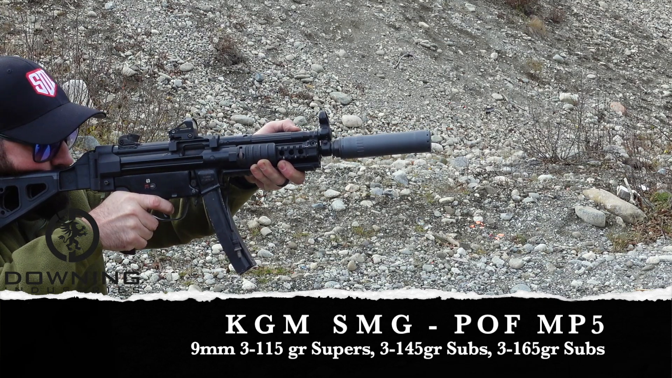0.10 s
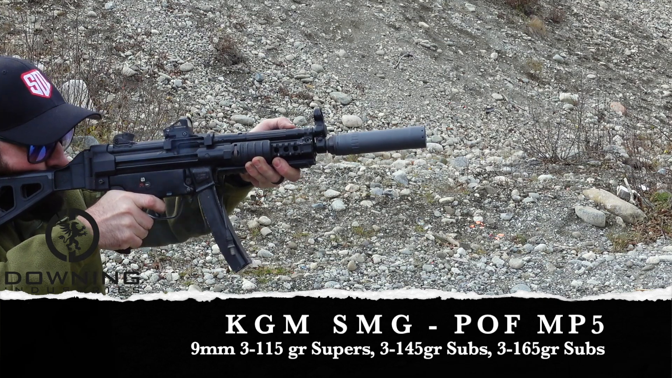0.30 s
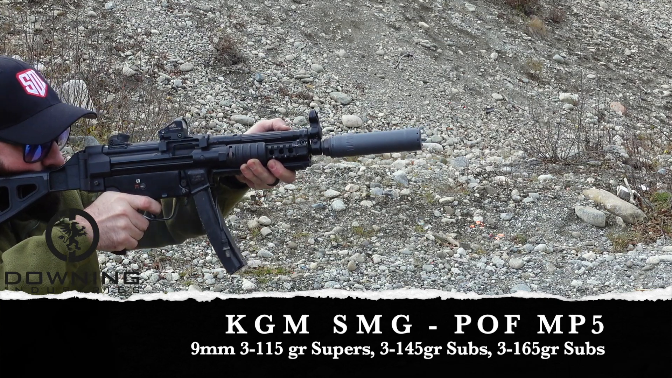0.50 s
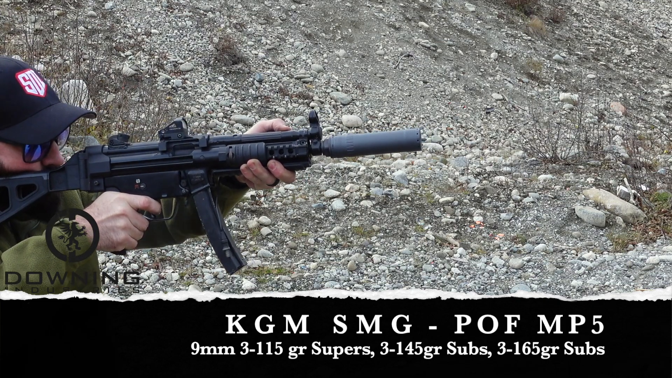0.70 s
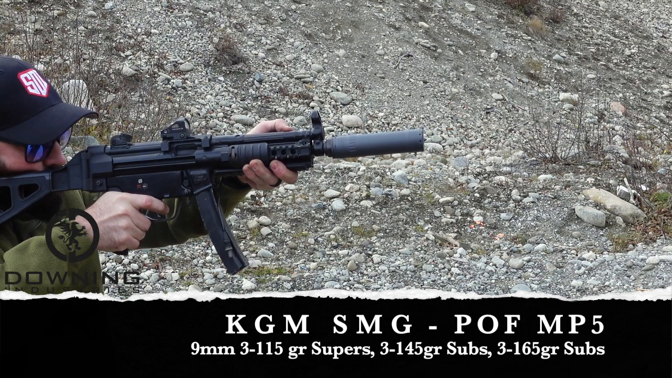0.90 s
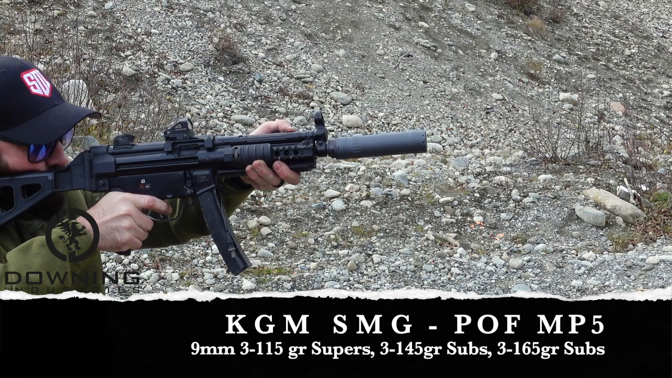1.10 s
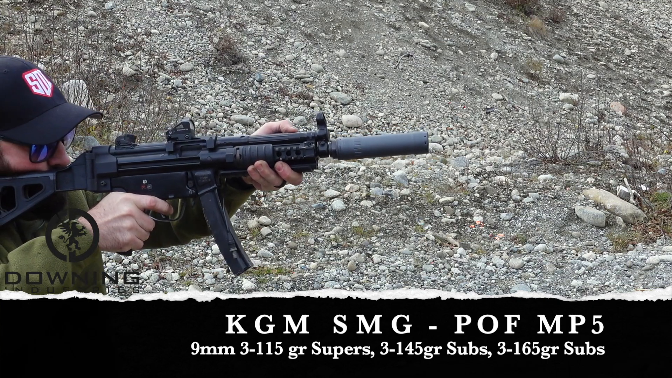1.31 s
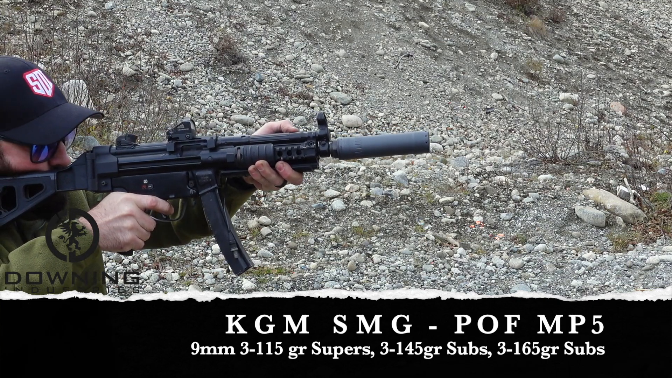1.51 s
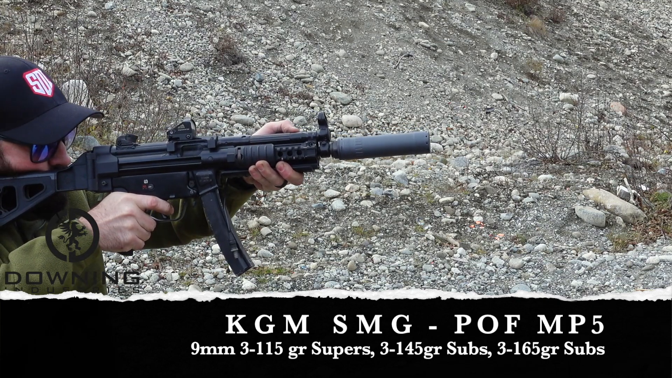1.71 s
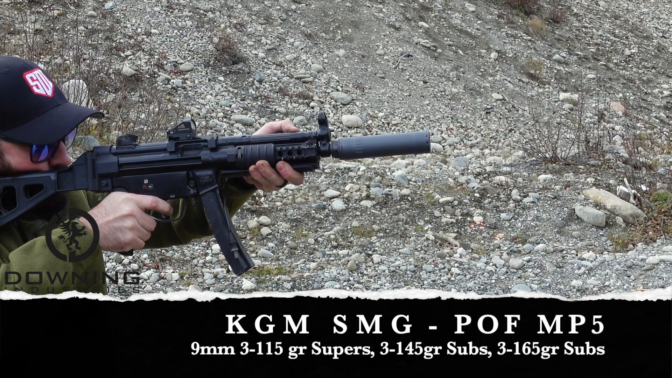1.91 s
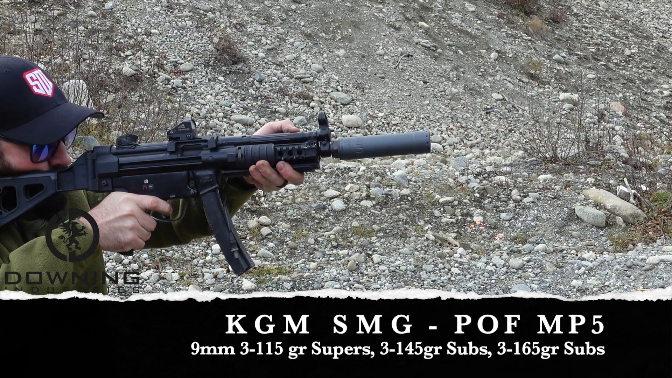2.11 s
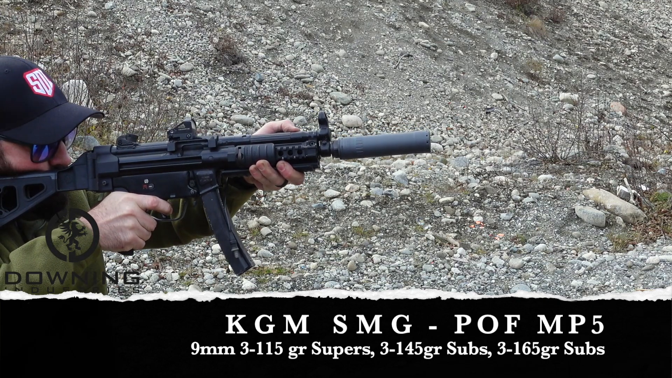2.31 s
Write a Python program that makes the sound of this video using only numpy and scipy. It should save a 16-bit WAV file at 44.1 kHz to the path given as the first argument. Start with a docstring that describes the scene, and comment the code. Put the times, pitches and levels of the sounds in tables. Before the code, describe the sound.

One muffled carbine shot coughs sharply outdoors, its action clacking, followed by echo and small reset click

```python
"""One shot from a suppressed 9 mm carbine at an outdoor gravel range, heard from close by.
Shaped noise makes the muzzle cough, the action contacts, the bullet's thud and the trigger reset click.
Decaying modes ring the suppressor, receiver and sear; a decaying sine is the low pressure swing.
The slopes return a slap and a hissing echo, band-split noise that dulls as it dies.
Quiet air, a light breeze and faint knocks lie behind."""
import sys
import numpy as np
from scipy import signal
from scipy.fft import rfft, irfft
from scipy.io import wavfile
from scipy.ndimage import uniform_filter1d

SR = 44100
rng = np.random.default_rng(int(sys.argv[2]) if len(sys.argv) > 2 else 0)


def store_wav(level_fs):
    """Save 16-bit WAV to argv[1]."""
    pcm = np.round(np.clip(np.atleast_2d(level_fs), -1, 1) * 32767)
    wavfile.write(sys.argv[1], SR, pcm.T.astype(np.int16))


N = 110250

# Spectra set colour only: their dB per Hz are relative.
# Outdoor background. Each row: frequency in Hz, density in dB per Hz.
AIR_SPECTRUM = [(20, -5), (55, -13), (110, -12), (180, -14.5), (360, -13), (700, -16), (1000, -17.5),
                (1700, -18), (2400, -27.5), (3540, -33.5), (7000, -39), (15500, -41)]
AIR_DB = -63
# Wind on the microphone. Each row: frequency in Hz, density in dB per Hz.
WIND_SPECTRUM = [(15, -5), (30, 0.5), (55, -4), (85, -9), (160, -24), (500, -50.5), (4000, -90)]
# Wind level over time. Each row: time in seconds, level in dB.
WIND_LEVEL_DB = [(0, -75), (.5, -80), (.61, -62), (.72, -77), (1.32, -77.5), (1.4, -65.5), (1.8, -68),
                 (2.0, -75), (2.5, -70.5)]

# Faint knocks after the shot. Each row: start in seconds, level in dB, centre in Hz, T60 in seconds.
KNOCK_EVENTS = [(1.402, -54.5, 560, .09), (1.703, -66, 1800, .1), (2.461, -67.5, 3650, .02)]
# Colour of a knock. Each row: multiple of the centre frequency, density in dB per Hz.
KNOCK_SPECTRUM = [(.2, -26), (.65, -9), (1, 0), (1.5, -11), (2.5, -26), (10, -60)]

# Scatter from the gravel slopes. Each row: frequency in Hz, initial density in dB per Hz, decay in dB per s.
SCATTER_BANDS = [(60, -17.5, 120), (151, -11, 95), (300, -4, 59.5), (560.3, 0.5, 41), (850, -1.5, 31),
                 (1300, -2, 21), (1800, -1.5, 21.5), (2501, -4, 29), (3600, -3.5, 33.5), (5505, -6.5, 44.5),
                 (8400, -8, 70.5), (12000, -12.5, 94.5), (15500, -18, 113)]
SCATTER_DB = -19
# Scatter level relative to SCATTER_DB. Each row: time in seconds, level in dB.
SCATTER_LEVEL_DB = [(.245, -3.5), (0.281, 1), (.303, -12), (.312, -6.5), (.33, -5.5), (.35, -1), (.38, 0.5),
                    (.425, 1.5), (.465, -2.5), (.52, -0.6), (.6, -0.95), (.835, -.5), (.865, -5),
                    (1.0, -11.5), (1.2, -24)]
SCATTER_RISE_S, GRAIN_DB, GRAINS_PER_S = 0.0054, 1.5, 350
PATCH_DB, PATCHES_PER_S = 1.2, 30  # uneven ground makes each band swell and fade
# Distant echo. Each row: frequency in Hz, density in dB per Hz.
FAR_SPECTRUM = [(300, -24.5), (600, -7.5), (1000, 1), (1500, 3), (2000, -0.5), (2600, -8), (3600, -9),
                (5000, -21.5), (8000, -38), (15000, -56)]
FAR_DB, FAR_T60_S = -37.5, 2.7

# Return from the nearest slope. Each row: frequency in Hz, density in dB per Hz.
SLAP_SPECTRUM = [(40, -28), (150, -0.5), (300, 3.5), (550, -16), (1500, -13), (4000, 3), (7000, -6.5),
                 (15000, -17)]
SLAP_S, SLAP_DB, SLAP_T60_S = .36, -24.5, .16

# Trigger reset contacts. Each row: start in seconds, level in dB, T60 in seconds.
RESET_CONTACTS = [(.8392, -43, .015), (.8433, -17.5, 0.017), (0.8436, -29, 0.011), (0.8488, -28.5, .026)]
# Sear contact colour. Each row: frequency in Hz, density in dB per Hz.
SEAR_SPECTRUM = [(30, -33.5), (190, -23), (460, -19.5), (590, 0), (800, 2.5), (1000, -3.5), (1400, 3),
                 (1900, -9.5), (2600, -2.5), (4600, -2), (5300, -10.5), (6300, -2), (7200, -7),
                 (11000, -11.5), (12800, -17), (14800, -15)]
# Sear ringing. Each row: frequency in Hz, level in dB, T60 in seconds.
SEAR_RING_MODES = [(775, -30.5, .03), (1410, -33, 0.026), (4130, -12.5, 0.0074), (4530, -18, 0.015)]
SEAR_RING_S = .8441
SEAR_SCATTER_DB, SEAR_SCATTER_T60_S = -51, .17  # the click coming back off the gravel

# Bullet hitting the bank and throwing gravel. Each row: start in seconds, level in dB, T60 in seconds.
BANK_IMPACTS = [(0.4061, -17, 0.063), (0.4161, -25, 0.038)]
# Impact colour. Each row: frequency in Hz, density in dB per Hz.
EARTH_SPECTRUM = [(30, -43), (100, -19), (280, -16.5), (420, 4), (600, 0.5), (780, -6), (1150, -1),
                  (2200, -11.5), (3200, -16), (4500, -10.5), (8000, -27), (15000, -58)]

# Steel contacts, in order: hammer, bolt at the rear (2), next round stripped and fed (4), bolt closing,
# two last contacts. Each row: start in seconds, level in dB, T60 in seconds.
ACTION_CONTACTS = [(0.2269, -13, 0.012), (0.26, -18.5, .010), (0.2725, -24.5, .012), (.2870, -16.5, .02),
                   (0.2879, -9, .016), (0.291, -13, 0.035), (0.2937, -9, 0.02), (0.2965, -2.5, .010),
                   (0.302, -23.5, .010), (0.3264, -22.5, 0.0082)]
# Steel contact colour. Each row: frequency in Hz, density in dB per Hz.
CONTACT_SPECTRUM = [(40, -40.5), (200, -19), (500, -9), (900, -4), (1800, -3.5), (3000, -1), (4400, 0),
                    (5150, -9), (6100, -1.5), (7700, -1), (8300, -7), (9200, -3.5), (10300, -4),
                    (12600, -12), (13500, -6), (14200, -12.5), (15500, -16)]
CONTACT_HOLD_S = .0013
# Receiver ringing. Each row: frequency in Hz, level in dB relative to hit and STEEL_DB, T60 in seconds.
STEEL_MODES = [(787, -22.5, .14), (2522, -18.5, 0.11), (2725, -18, .13), (2850, -20, 0.083),
               (3036, -19.5, .12), (3325, -18.5, .15), (3545, -19.5, .16), (4480, -19, .06),
               (5480, -18, .09), (5900, -17.5, .09), (6460, -19, .06), (6950, -20, .09), (7700, -20, .05)]
STEEL_DB, STEEL_SHOT_DB = -8, 0  # ring gain; strength of the shot as a hit

# Gas leaving the suppressor. Each row: frequency in Hz, density in dB per Hz.
BLAST_SPECTRUM = [(40, -22), (140, -6), (220, -9.5), (310, 1), (540, -8.5), (700, -10), (820, 0),
                  (1000, -7.5), (1200, 2), (1450, -5.5), (2000, -2.5), (2200, -9.5), (3050, -2), (3700, -4),
                  (4550, -13.5), (5480, -3), (6400, -6), (7500, -9), (8500, -8.5), (9500, -11),
                  (12300, -15), (15500, -19)]
SHOT_S = .2359
BLAST_DB, BLAST_HOLD_S, BLAST_T60_S = 1, .0027, .026
THUMP_HZ, THUMP_DB, THUMP_RISE_S = 110, -11.5, .0035  # the pressure swing under the blast
# Hollow ring of the suppressor. Each row: frequency in Hz, level in dB, T60 in seconds.
SUPPRESSOR_MODES = [(330, -21.5, .07), (520, -15, .06), (820, -16.5, 0.067), (1190, -12, .035)]
# Low rumble of the shot. Each row: frequency in Hz, density in dB per Hz.
RUMBLE_SPECTRUM = [(20, -2.5), (45, -0.5), (110, -2), (200, -13.5), (400, -32.5)]
RUMBLE_DB, RUMBLE_T60_S = -34, .24

CEILING, CLIP_HARDNESS = .97, 4
CUTOFF_HZ = 15750


def from_db(db):
    """Decibels to gain."""
    return 10 ** (np.asarray(db) / 20)


def rms_one(x):
    """Scale to unit power."""
    return x / np.sqrt(np.mean(x ** 2) + 1e-20)


def since(start_s):
    """Seconds since a moment, zero before it."""
    return np.maximum(np.arange(N) / SR - start_s, 0)


def bin_hz():
    """Frequencies of the FFT bins."""
    return np.arange(N // 2 + 1) * SR / N


def at_hz(points, hz, column=1):
    """Read a table's column on a log-frequency axis."""
    table = np.array(points)
    return np.interp(np.log(hz + 1e-3), np.log(table[:, 0]), table[:, column])


def at_time(points):
    """Read a (s, dB) table at every sample."""
    return np.interp(since(0), *np.transpose(points))


def noise(spectrum):
    """Steady noise of a given colour, rms 1."""
    white = rfft(rng.standard_normal(N))
    return rms_one(irfft(white * from_db(at_hz(spectrum, bin_hz())), N))


def envelope(start_s, t60_s, hold_s=0, attack_s=0.00038):
    """Linear rise and exponential release; hold_s, counted from the start, delays the release."""
    rise = np.minimum(since(start_s) / attack_s, 1)
    return rise * from_db(-60 * since(start_s + hold_s) / t60_s)


def burst(spectrum, shape):
    """Noise under a short envelope, evened out so that even a brief burst has the given colour."""
    raw = rfft(noise(spectrum) * shape)
    power = np.maximum(uniform_filter1d(np.abs(raw) ** 2, size=300), 1e-20)
    colour = from_db(at_hz(spectrum, bin_hz()))
    evened = irfft(raw * colour / np.sqrt(power), N)
    gate = shape > 1e-4 * shape.max()
    return rms_one(evened * gate) * np.sqrt(np.mean(shape ** 2))


def ring(hits, modes):
    """Each hit (s, dB) sets every mode, a two-pole resonator, ringing with a random strength."""
    out = np.zeros(N)
    for hz, level_db, t60_s in modes:
        clicks = np.full(N, 1e-18)  # tiny offset, inaudible
        for hit_s, hit_db in hits:
            clicks[int(hit_s * SR)] += from_db(hit_db + level_db + rng.standard_normal())
        radius = from_db(-60 / (t60_s * SR))
        angle = 2 * np.pi * hz / SR
        out += signal.lfilter([.5, 0, -.5], [1, -2 * radius * np.cos(angle), radius ** 2], clicks)
    highpass = signal.butter(2, modes[0][0] / 2, "high", fs=SR, output="sos")
    return signal.sosfilt(highpass, out)


def outdoors():
    """Quiet air as steady noise, and a light breeze on the microphone as low noise of varying level."""
    air = from_db(AIR_DB) * noise(AIR_SPECTRUM)
    wind = from_db(at_time(WIND_LEVEL_DB)) * noise(WIND_SPECTRUM)
    return air + wind


def knocks():
    """Faint, soft knocks in the quiet after the shot: decaying noise around a centre frequency."""
    out = np.zeros(N)
    for start_s, level_db, centre_hz, t60_s in KNOCK_EVENTS:
        spectrum = [(centre_hz * multiple, density_db) for multiple, density_db in KNOCK_SPECTRUM]
        shape = envelope(start_s, t60_s, hold_s=0.004, attack_s=0.0026)
        out += from_db(level_db) * noise(spectrum) * shape
    return out


def slopes():
    """Dense reflections off the stones as noise; bass and treble die first, a distant echo lingers."""
    t, hz = since(SHOT_S), bin_hz()
    scatter = rfft(noise(SCATTER_BANDS))
    far = from_db(FAR_DB) * noise(FAR_SPECTRUM) * envelope(SHOT_S, FAR_T60_S, attack_s=.1)

    grain_s = np.arange(0, N / SR, 1 / GRAINS_PER_S)
    grain_db = GRAIN_DB * np.interp(t, grain_s, rng.standard_normal(len(grain_s)))

    centres_hz = np.geomspace(60, 16000, 20)
    near = np.zeros(N)
    for centre_hz, share in zip(centres_hz, np.eye(len(centres_hz))):
        patches = rng.standard_normal(200)
        patch_db = PATCH_DB * np.interp(t * PATCHES_PER_S, np.arange(len(patches)), patches)
        decay_db = at_hz(SCATTER_BANDS, centre_hz, column=2) * t
        band = irfft(scatter * np.interp(hz, centres_hz, share), N)  # triangular bands
        near += band * from_db(patch_db - decay_db)

    rise = np.minimum(t / SCATTER_RISE_S, 1)
    return near * rise * from_db(SCATTER_DB + at_time(SCATTER_LEVEL_DB) + grain_db) + far


def slap():
    """The first broad return of the shot, with its bass still in it: one softened noise burst."""
    shape = envelope(SLAP_S, SLAP_T60_S, hold_s=0.014, attack_s=0.0069)
    return burst(SLAP_SPECTRUM, from_db(SLAP_DB) * shape)


def trigger():
    """The sear slips back in a few tiny contacts, rings briefly and scatters off the gravel."""
    shape = sum(from_db(level_db) * envelope(start_s, t60_s, hold_s=0.00083)
                for start_s, level_db, t60_s in RESET_CONTACTS)
    cracks = burst(SEAR_SPECTRUM, shape)
    scatter_shape = envelope(SEAR_RING_S, SEAR_SCATTER_T60_S, attack_s=.005)
    scatter = from_db(SEAR_SCATTER_DB) * noise(SEAR_SPECTRUM) * scatter_shape
    return cracks + scatter + ring([(SEAR_RING_S, 0)], SEAR_RING_MODES)


def bullet():
    """A dull smack from the bank: soft-edged noise bursts."""
    shape = sum(from_db(level_db) * envelope(start_s, t60_s, hold_s=.003, attack_s=0.0016)
                for start_s, level_db, t60_s in BANK_IMPACTS)
    return burst(EARTH_SPECTRUM, shape)


def action():
    """Hammer and bolt: each contact cracks and rings the receiver; the shot rings it too."""
    cracks = np.zeros(N)
    hits = [(SHOT_S, STEEL_SHOT_DB)]
    for start_s, level_db, t60_s in ACTION_CONTACTS:
        shape = envelope(start_s, t60_s, CONTACT_HOLD_S)
        cracks += burst(CONTACT_SPECTRUM, from_db(level_db) * shape)
        hits.append((start_s, level_db))
    return cracks + from_db(STEEL_DB) * ring(hits, STEEL_MODES)


def muzzle():
    """A short cough of gas rings the suppressor, over one low pressure swing and a brief rumble."""
    gas_shape = envelope(SHOT_S, BLAST_T60_S, BLAST_HOLD_S, attack_s=0.00045)
    gas = burst(BLAST_SPECTRUM, from_db(BLAST_DB) * gas_shape)

    t = since(SHOT_S)
    swell = (t / THUMP_RISE_S) * np.exp(1 - t / THUMP_RISE_S)  # peaks at 1 after THUMP_RISE_S
    thump = from_db(THUMP_DB) * swell * np.sin(2 * np.pi * THUMP_HZ * t)

    hollow_ring = ring([(SHOT_S, 0)], SUPPRESSOR_MODES)
    rumble = from_db(RUMBLE_DB) * noise(RUMBLE_SPECTRUM) * envelope(SHOT_S, RUMBLE_T60_S)
    return gas + thump + hollow_ring + rumble


def scene():
    """The gun, the bank and the echoes over quiet outdoor air, in one channel."""
    background = outdoors() + knocks()
    echoes = slopes() + slap()
    gun = trigger() + action() + muzzle()
    return (background + echoes + bullet() + gun)[None]


def record(dry):
    """The loudest peaks overload the input, which rounds them off; a steep low-pass cuts the top."""
    clipped = dry / (1 + np.abs(dry / CEILING) ** CLIP_HARDNESS) ** (1 / CLIP_HARDNESS)
    lowpass = signal.ellip(12, .2, 70, CUTOFF_HZ, fs=SR, output="sos")  # .2 dB ripple, 70 dB stop
    return signal.sosfilt(lowpass, clipped)


dry = scene()
out = record(dry)
store_wav(out)
```